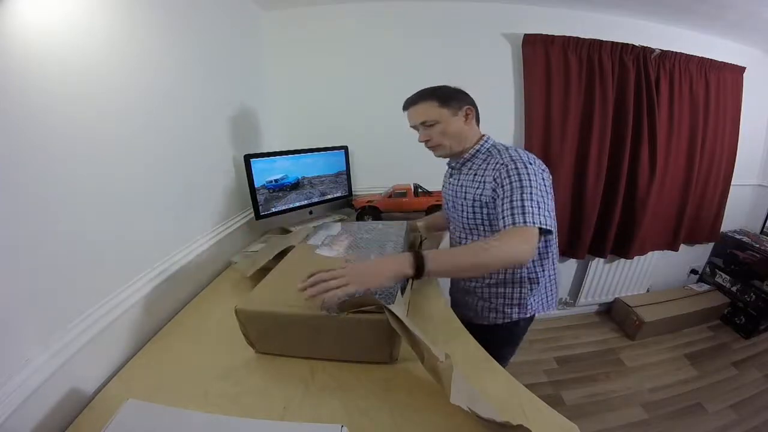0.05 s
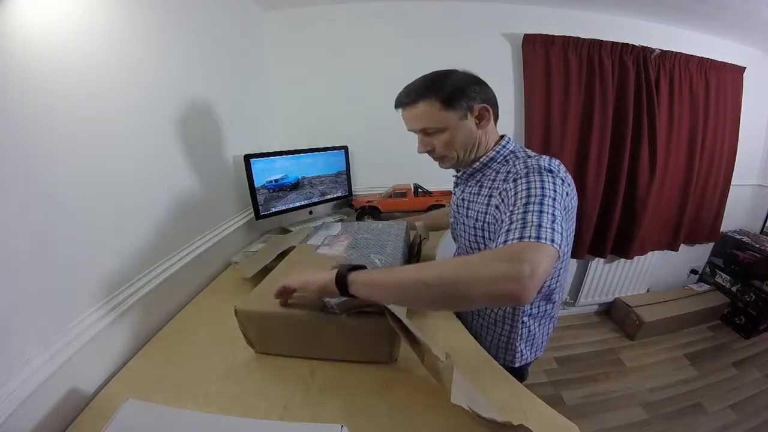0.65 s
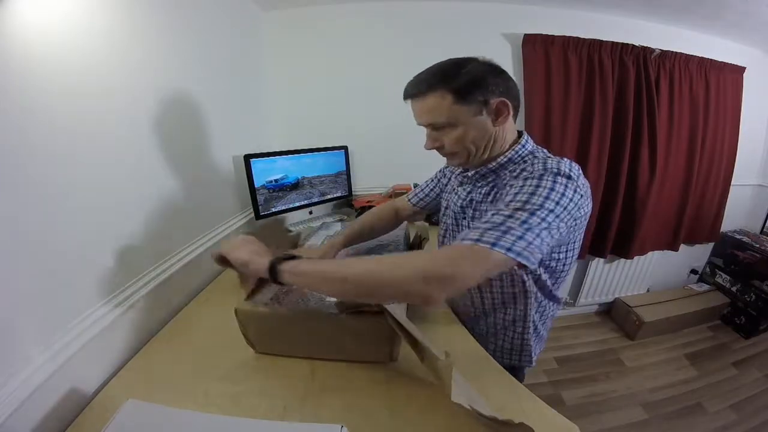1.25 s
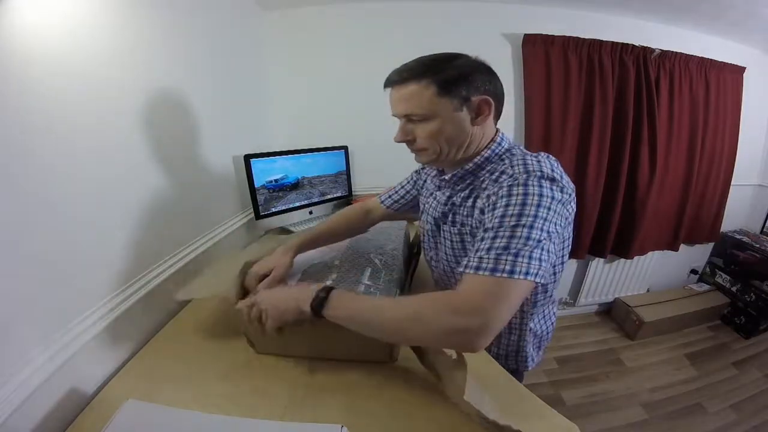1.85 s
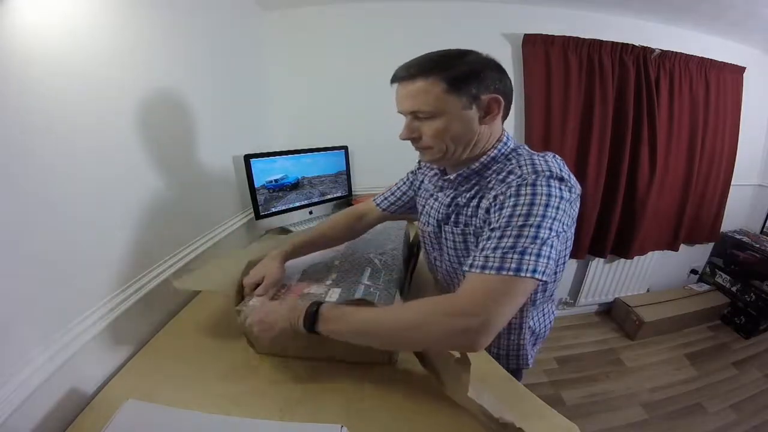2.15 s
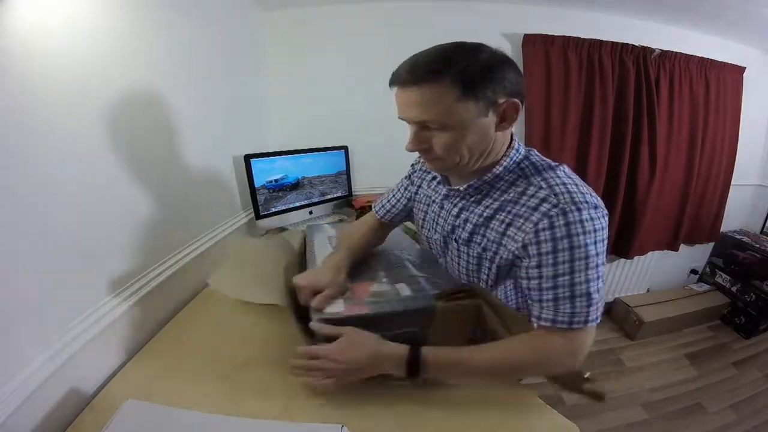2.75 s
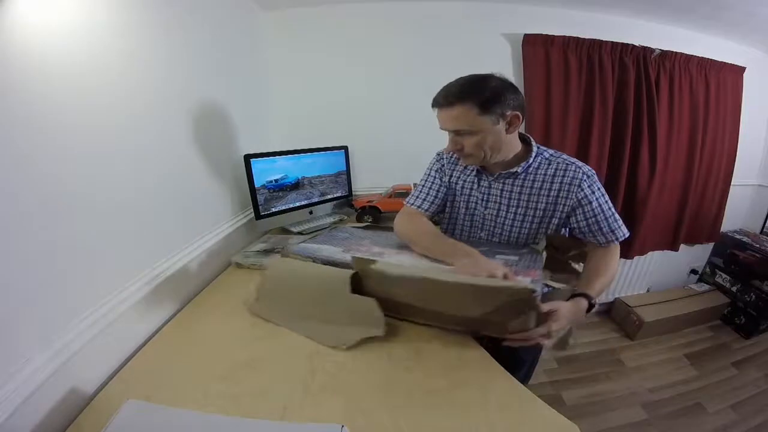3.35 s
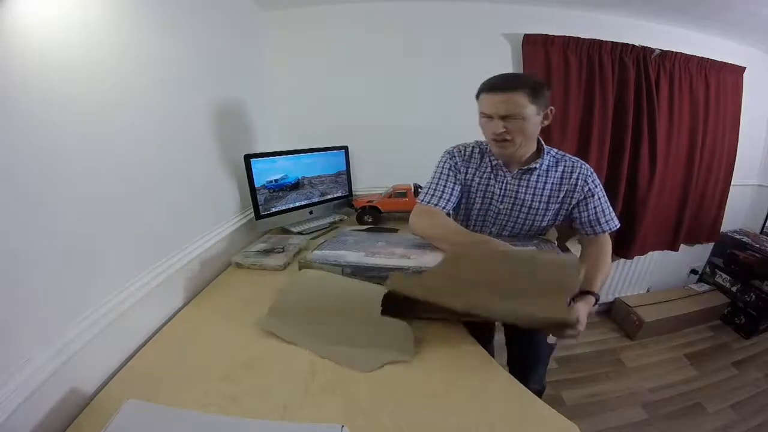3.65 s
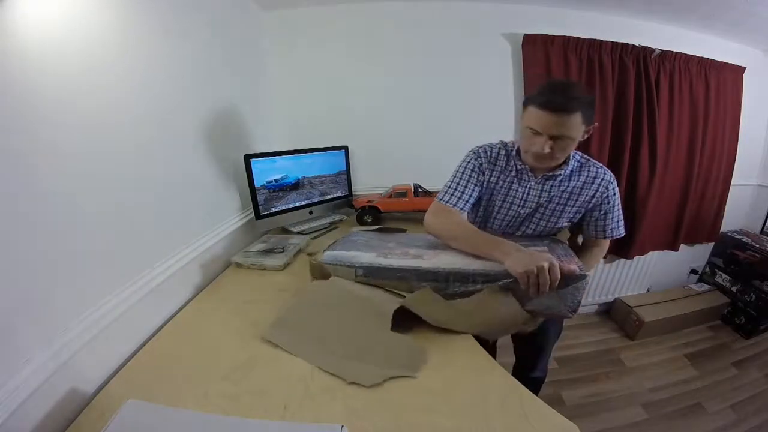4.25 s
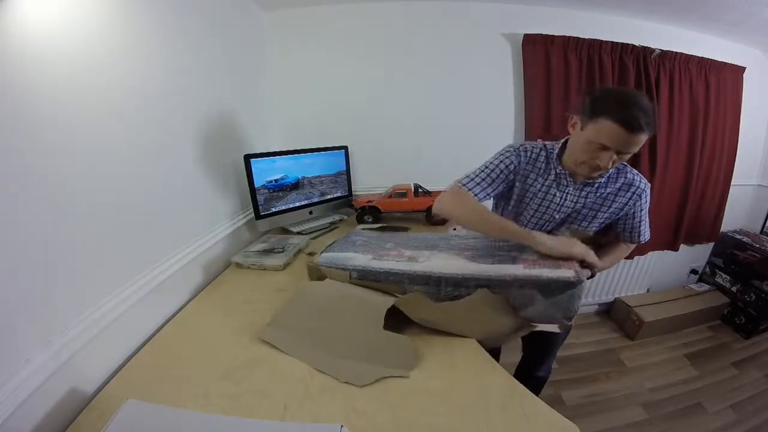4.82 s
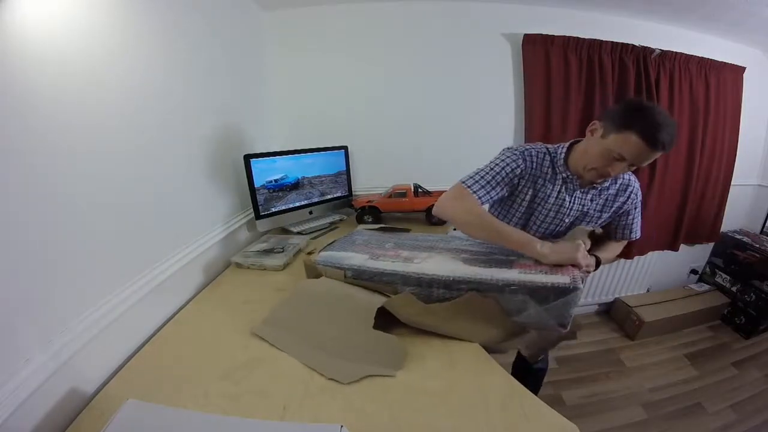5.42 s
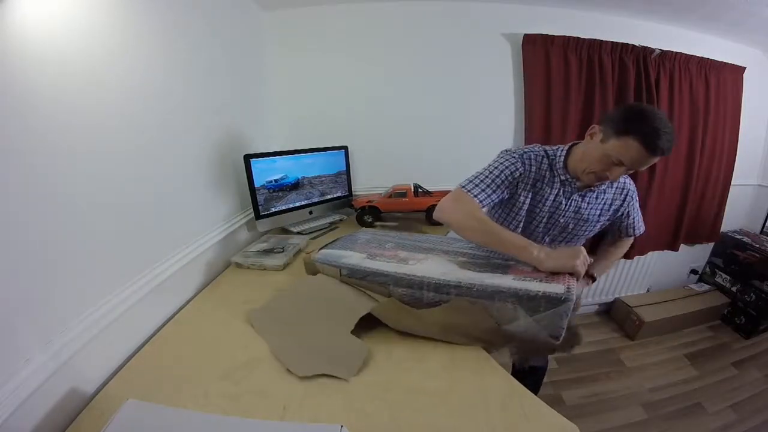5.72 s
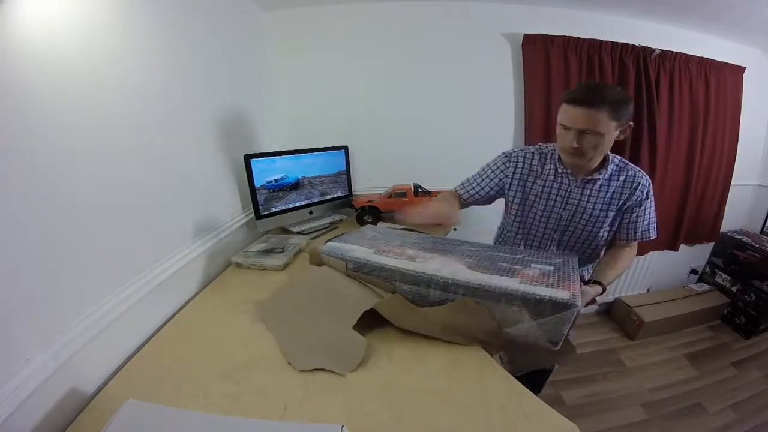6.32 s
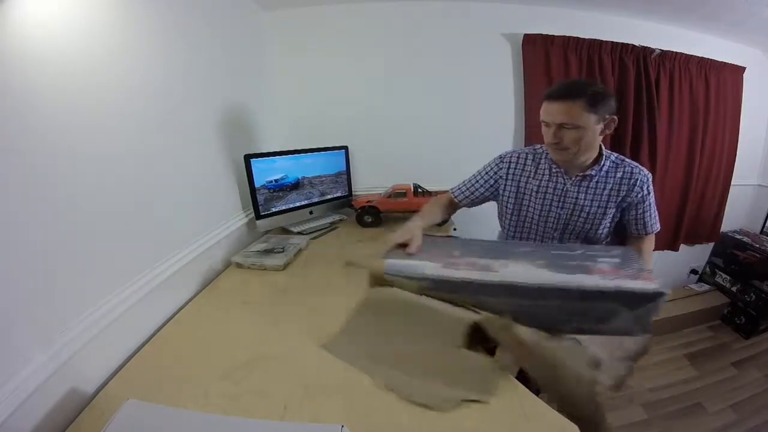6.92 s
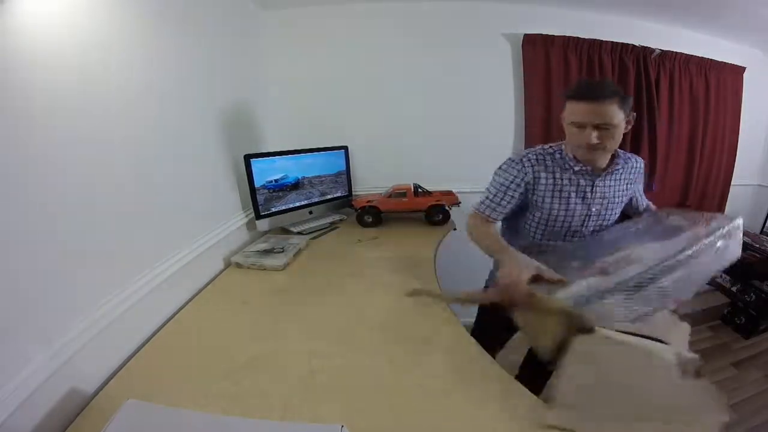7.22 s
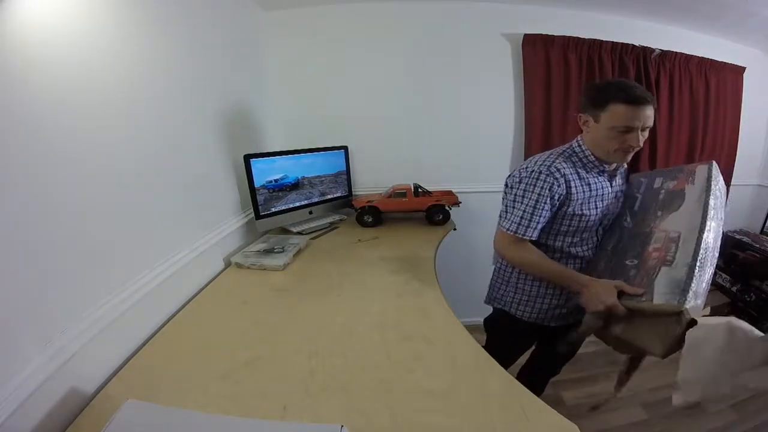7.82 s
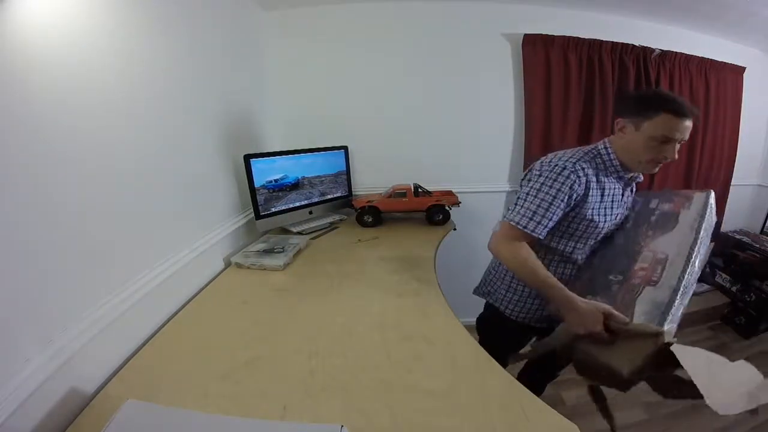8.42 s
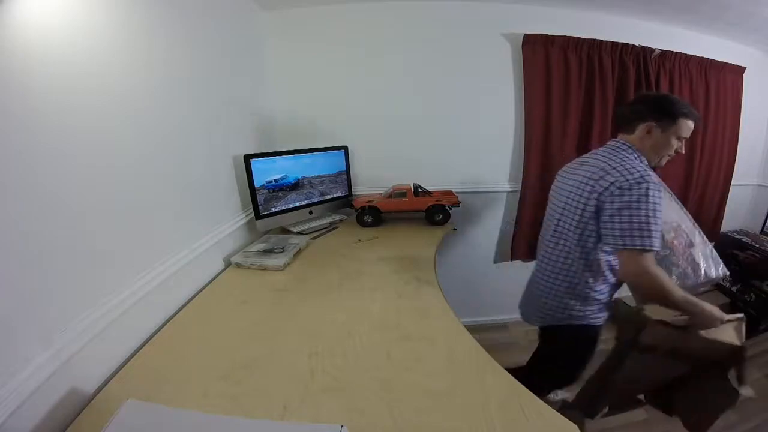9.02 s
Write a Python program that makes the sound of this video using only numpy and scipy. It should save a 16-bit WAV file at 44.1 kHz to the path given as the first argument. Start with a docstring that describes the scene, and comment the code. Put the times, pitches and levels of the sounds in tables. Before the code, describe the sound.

A parcel is unwrapped close to the microphone in a small, hushed room. In the first second, cardboard flaps knock hollowly, with a short squeak and dull bumps. From about 1 to 2.5 seconds, cardboard scrapes, paper crumples and plastic film crinkles in loud, uneven bursts with snapping creases and a tiny high squeak near 2 seconds. The rustling eases around 3 seconds, then surges from 3.5 to 4.2 as flaps knock and the box judders over the desk with a low boom and a thump. Crackling continues, with a knock at 5.2 and another loud crumple near 5.7. Gentler rustling and sliding follow from 6 to 7.4 seconds, ending in a crisp snap. The hollow box bumps dully several times between 7.6 and 8 seconds. Light crinkles and a soft bump trail on, with a last crackle just after 9 seconds.

```python
"""Unpacking a box at a desk

A box wrapped in plastic film is pulled out of its cardboard and packing paper in a small, hushed room.
Cardboard scrapes, paper crumples and film crinkles, each in showers of tiny clicks as its folds slip.
Creases snap, flaps knock and squeak, and the box judders on the desk and bumps against desk and body."""
import sys
import numpy as np
from scipy import signal
from scipy.fft import irfft
from scipy.io import wavfile
from scipy.ndimage import uniform_filter1d

SR = 44100
rng = np.random.default_rng(int(sys.argv[2]) if len(sys.argv) > 2 else 0)


def master(y):
    """Save y as 16-bit WAV."""
    cut = np.clip(np.atleast_2d(y).T, -1, 1)
    pcm = np.round(cut * 32767)  # scale
    wavfile.write(sys.argv[1], SR, pcm.astype(np.int16))


N = 404397
TIME = np.arange(N) / SR
FREQS = np.fft.rfftfreq(4096, 1 / SR)  # every tone curve is read at these frequencies, in Hz


def amp(db):
    """Turns decibels into a gain."""
    return 10 ** (np.asarray(db) / 20)


def unit(x):
    """Scales a signal to an average power of 1."""
    return x / np.sqrt(np.mean(x ** 2) + 1e-20)


def curve(points):
    """Joins (frequency, level) points into a tone curve in dB."""
    hz, db = np.transpose(points)
    return np.interp(np.log(FREQS + 1), np.log(hz + 1), db)


def add(mix, start, sound):
    """Mixes a sound in at a start time in seconds."""
    part = mix[max(round(start * SR), 0):][:len(sound)]
    part += sound[:len(part)]


def colour(x, curve_db):
    """Filters by the shape of a tone curve; white noise keeps its power."""
    log_gain = np.log(amp(np.r_[curve_db, curve_db[-2:0:-1]]))
    spectrum = np.exp(np.conj(signal.hilbert(log_gain)))  # rings after a click, never before
    response = irfft(spectrum[:len(FREQS)])
    return signal.oaconvolve(x, response / np.linalg.norm(response))[:len(x)]


def fade(x, seconds):
    """Gives every click a fading tail."""
    return signal.lfilter([1], [1, -np.exp(-1 / (seconds * SR))], x)


def linger(power, seconds):
    """Spreads power over a fading tail with the same energy."""
    return fade(power, seconds) / (seconds * SR)


def crackle(length, per_s):
    """Tiny clicks of random size and timing, with an average power of 1."""
    chance = min(per_s / SR, 1)
    return rng.standard_normal(length) * (rng.random(length) < chance) / np.sqrt(chance)


def buckle(build_s, clicks_per_s):
    """A sheet gives way in one shower of clicks that builds and dies."""
    age = np.arange(SR // 4) / SR / build_s
    burst = crackle(len(age), clicks_per_s) * age ** 0.7 * np.exp(-age)
    return burst / np.linalg.norm(burst) * np.sqrt(SR / 50)  # as much energy as 20 ms at power 1


def fold_tone(spread_db, width):
    """Each fold rings in its own way: random broad hills and dips for a tone curve."""
    ripple = uniform_filter1d(rng.standard_normal(len(FREQS)), width)
    return spread_db * unit(uniform_filter1d(ripple, width))


def room(x, desk_db, walls_db, desk_s=0.0088, walls_s=0.016):
    """Echoes of a moving source never repeat, so they are noise that trails its power."""
    desk, walls = amp(desk_db) ** 2, amp(walls_db) ** 2
    power = x ** 2 + 1e-20
    echo_power = desk * linger(power, desk_s) + walls * linger(power, walls_s)
    echoes = rng.standard_normal(len(x)) * np.sqrt(echo_power)
    return (x + echoes) / np.sqrt(1 + desk + walls)


def gesture(start, build, hold, swell_db=18, fall_db_per_s=146):
    """The power of one hand movement: it swells, holds at 1 and dies away."""
    age = TIME - start
    rise_db = swell_db * np.minimum(age / build - 1, 0)
    fall_db = fall_db_per_s * np.maximum(age - build - hold, 0)
    return amp(rise_db - fall_db) ** 2


# the tone of the background: f/Hz, level/dB
HUSH_TONE = [(20, 2.5), (100, -4.5), (250, -8.5), (600, -8), (2000, -45), (8000, -31), (15000, -42)]
def hush():
    """The still room and a faint microphone hiss make a steady noise."""
    return amp(-53.5) * colour(rng.standard_normal(N), curve(HUSH_TONE))


# times when the parcel is held: start/s, end/s, firmness/dB
GRIPS = [(.86, 6.02, -2.5), (6.15, 6.6, -11.5), (6.66, 8.13, -1), (8.15, 9.17, -4.5)]
def grip():
    """The power of the small movements of hands holding the parcel."""
    return sum(amp(db) ** 2 * gesture(start, build=0.017, hold=end - start) for start, end, db in GRIPS)


# the boom of the desk top: f/Hz, level/dB
DESK_TONE = [(20, -13), (45, -15), (65, 2.5), (80, -1.5), (100, -3.5), (140, -7.5), (185, -5), (240, -10),
             (400, -7.5), (1500, -89)]
# pushes across the desk: start/s, hold/s, level/dB
SHOVES = [(.27, 0.034, -41.5), (0.642, 0.035, -42), (0.974, 0.12, -43.5), (1.92, 0.025, -42.5),
          (2.38, 0.044, -46), (3.52, .2, -50), (3.785, .1, -34), (3.974, 0.054, -42), (4.317, 0.37, -45),
          (4.83, 0.037, -44.5), (5.147, .32, -45.5), (5.58, 0.36, -44.5), (6.13, 0.026, -42),
          (6.528, 0.11, -42), (6.864, 0.23, -45), (7.53, 0.64, -52), (8.858, 0.18, -50)]
def shoves():
    """The box judders over the desk top, which booms."""
    power = amp(-53) ** 2 * grip()  # a held box never rests quite still
    for start, hold, db in SHOVES:
        power += amp(db) ** 2 * gesture(start, build=0.051, hold=hold, fall_db_per_s=101)
    judder = colour(crackle(N, per_s=400), curve(DESK_TONE))
    return amp(-2) * judder * np.sqrt(power)


# skin on film (high) and flap on flap (low):
# t/s, length/s, first f/Hz, last f/Hz, level/dB, waver/share of the pitch
SQUEAKS = [(0.002, 0.064, 3020, 4060, -43.5, 0.11), (0.603, 0.041, 3960, 3900, -49, 0.069),
           (0.682, 0.074, 620, 605, -27.5, 0.044), (1.958, 0.037, 3770, 4940, -35.5, .09)]
def squeaks(overtone_db=-17, ring_s=0.0083):
    """Quick sticking and slipping makes a note that glides, wavers and rings off."""
    out, t = np.zeros(N), np.arange(SR // 4) / SR
    for start, length, first_hz, last_hz, db, jitter in SQUEAKS:
        glide = (first_hz - last_hz) * np.maximum(1 - t / length, 0) ** 3
        waver = 1 + jitter * unit(fade(rng.standard_normal(len(t)), 0.00047))
        phase = 2 * np.pi * np.cumsum((last_hz + glide) * waver) / SR
        note = np.sin(phase) + amp(overtone_db) * np.sin(2 * phase)
        arch = np.sin(np.pi * np.minimum(t / length, 1))
        swell = np.sqrt(2 * linger(arch, ring_s))
        add(out, start, amp(db) * swell * note)
    return out


# dull bumps of the hollow box: t/s, level/dB, f/Hz, time to fade by 60 dB/s
BUMPS = [(0.316, -35, 375, .1), (0.327, -29, 150.5, 0.23), (0.884, -27.5, 464, 0.18),
         (0.93, -32.5, 151, 0.26), (1.964, -45, 171, 0.15), (2.706, -38, 496, 0.11),
         (2.779, -31.5, 64, 0.21), (3.87, -32, 40.4, 0.36), (4.053, -24.5, 188.5, 0.23),
         (5.194, -32.5, 237, 0.31), (5.292, -32, 144, 0.22), (6.169, -31.5, 97.3, 0.22),
         (6.96, -40, 71.3, .5), (7.605, -25.5, 231, 0.11), (7.621, -26.5, 430, 0.14),
         (7.635, -33.5, 122, 0.2), (7.79, -35.5, 215, 0.27), (7.921, -29, 410, 0.07),
         (7.942, -35, 70.6, 0.25), (7.949, -34, 210, 0.2), (8.522, -37, 164, 0.18)]
def bumps(rise_s=0.0027):
    """A soft blow sets one side of the box swinging unevenly."""
    out, t = np.zeros(N), np.arange(SR // 2) / SR
    for start, db, hz, ring_s in BUMPS:
        wobble = unit(fade(rng.standard_normal(len(t)), 0.0015))
        swing = np.sin(2 * np.pi * hz * t + wobble)
        rise = 1 - np.exp(-t / rise_s)
        add(out, start, swing * rise * amp(db - 60 * t / ring_s))
    return out


# the hollow tone of a cardboard flap: f/Hz, level/dB
FLAP_TONE = [(100, -27), (250, -23), (420, -4.5), (600, -11), (900, 0), (1250, -12), (1700, -10),
             (2300, -13), (3000, -22), (3800, -26), (5500, -32.5), (9000, -32), (15000, -50)]
# flaps knocking: t/s, level/dB, build-up/s
KNOCKS = [(0.327, -25, 0.0015), (0.359, -21.5, 0.00097), (0.658, -29.5, 0.0014), (0.668, -28.5, 0.0062),
          (0.861, -35, 0.00096), (2.7, -32.5, 0.0021), (3.664, -31.5, 0.00099), (3.875, -24, 0.0034),
          (5.197, -24.5, 0.0042), (7.941, -33, 0.0038), (8.561, -40, 0.0012)]
def knocks():
    """A flap slaps shut and rings briefly around its hollow note."""
    out = np.zeros(N)
    for start, db, build_s in KNOCKS:
        slap = room(buckle(build_s, clicks_per_s=6000), desk_db=-2, walls_db=7.5)
        add(out, start, amp(db) * colour(slap, curve(FLAP_TONE)))
    return out


# pulls on the packing: start/s, build-up/s, hold/s, cardboard level/dB, paper level/dB, film level/dB
PULLS = [(0, 0.0067, 0.011, -44.5, -44.5, -46), (0.163, 0.045, 0.015, -50, -52, -51.5),
         (0.562, 0.022, 0.036, -60, -56, -53), (0.841, 0.016, 0.037, -57, -42, -44),
         (1.004, 0.02, 0.041, -28.5, -28.5, -36), (1.041, 0.16, 0.058, -27, -21.5, -24.5),
         (1.333, 0.048, 0.16, -33, -37, -42), (1.558, 0.05, 0.096, -31, -32.5, -59),
         (1.747, 0.057, 0.045, -35.5, -43.5, -49), (1.931, 0.04, 0.02, -34, -38.5, -40),
         (2.211, 0.042, 0.18, -30, -24, -30), (2.684, 0.022, 0.045, -38.5, -39.5, -45),
         (2.84, 0.12, .04, -42, -41.5, -45.5), (3.33, 0.052, .015, -43, -50, -52),
         (3.516, 0.048, 0.034, -35, -40, -59), (3.664, 0.036, 0.039, -32, -34, -37),
         (3.751, 0.04, .14, -26, -29.5, -57), (3.929, .13, 0.062, -23, -24.5, -31.5),
         (4.274, 0.028, 0.11, -34.5, -39.5, -49.5), (4.548, 0.072, 0.02, -29.5, -30, -33.5),
         (4.815, 0.1, 0.017, -36.5, -39, -44), (5.125, 0.12, 0.076, -47, -50, -39.5),
         (5.3, 0.18, 0.2, -32.5, -32.5, -38), (5.629, 0.1, 0.068, -25, -24.5, -29.5),
         (5.85, 0.056, 0.068, -37, -40.5, -60), (6.141, 0.046, 0.027, -36, -36, -38.5),
         (6.414, .03, 0.052, -47, -52, -52), (6.608, 0.27, 0.29, -35.5, -36.5, -43.5),
         (7.372, 0.046, .015, -34.5, -36.5, -43), (7.553, .06, 0.039, -40, -60, -42.5),
         (7.928, 0.063, 0.067, -41, -58, -44), (8.176, 0.023, .015, -50, -69, -60),
         (8.305, 0.017, 0.037, -54, -53, -50.5), (8.593, 0.12, 0.076, -46, -45.5, -57),
         (8.868, 0.057, 0.15, -38, -38.5, -47)]
def effort(grip_db=(-47, -46.5, -48)):
    """How hard the hands work cardboard, paper and film, as three gains: the grip plus every pull."""
    power = np.outer(amp(grip_db) ** 2, grip())
    for start, build, hold, *levels_db in PULLS:
        power += np.outer(amp(levels_db) ** 2, gesture(start, build, hold))
    return np.sqrt(power + 1e-12)


def rustle(tone, gain, slips_per_s, spread_db, slip_s, rub, clicks_per_s, fold_db=3, walls_db=-3):
    """Folds slip in little showers of clicks, over the steady rub of sheet on sheet."""
    sound, power = np.zeros(N), np.zeros(N)
    folds = 4
    for _ in range(folds):
        sizes = amp(spread_db * np.minimum(rng.exponential(1, N), 3))
        starts = rng.random(N) < slips_per_s / folds / SR
        slips = fade(sizes ** 2 * starts + 1e-12, slip_s)
        activity = slips / slips.mean() + rub
        clicks = gain * crackle(N, clicks_per_s) * np.sqrt(activity)
        echoing = room(clicks, desk_db=-3.5, walls_db=walls_db)
        sound += colour(echoing, curve(tone) + fold_tone(fold_db, width=12))
        power += activity
    # the hands set the power; chance only shares it out among the slips
    return sound / np.sqrt(uniform_filter1d(power, size=3000))


# the tones of dull cardboard, crisp paper and bright film: f/Hz, level/dB
CARDBOARD_TONE = [(90, -23.5), (200, -13), (320, -11), (450, -4.5), (680, -4.5), (820, 0), (960, 0),
                  (1100, -5.5), (1350, -9.5), (2200, -16), (5000, -51), (15000, -63)]
PAPER_TONE = [(300, -16.5), (900, -4), (1400, -5), (2000, 4), (2800, -2.5), (3700, -5), (4600, -10.5),
              (6000, -9.5), (15000, -60)]
FILM_TONE = [(1000, -48), (3000, -9), (4500, -4.5), (6500, 2), (8000, -1.5), (9800, -3.5), (11500, -8.5),
             (13500, -16.5), (15500, -23.5)]
def packing():
    """Cardboard scrapes, paper crumples and film crinkles as the hands work them."""
    cardboard_gain, paper_gain, film_gain = effort()
    cardboard = rustle(CARDBOARD_TONE, cardboard_gain, slips_per_s=150, spread_db=3,
                       slip_s=0.0019, rub=0.55, clicks_per_s=2500)
    paper = rustle(PAPER_TONE, paper_gain, slips_per_s=180, spread_db=1,
                   slip_s=0.0028, rub=0.32, clicks_per_s=3500)
    film = rustle(FILM_TONE, film_gain, slips_per_s=180, spread_db=-0.5,
                  slip_s=0.0018, rub=0.81, clicks_per_s=7000, fold_db=3.5, walls_db=-4.5)
    return amp(-1.28) * cardboard + amp(-1.7) * paper + amp(0.56) * film


# the loudest creases: t/s, cardboard level/dB, paper level/dB, film level/dB, build-up/s
SNAPS = [(.254, -50, -56, -51, 0.0014), (0.511, -55, -64, -54.5, 0.0098), (.586, -68, -70, -51, 0.0045),
         (.712, -37.5, -57, -41, 0.0055), (0.726, -42, -39, -52, .0067), (0.744, -56, -31.5, -43.5, 0.0053),
         (.929, -37, -36, -37, 0.0029), (1.024, -34, -23, -21.5, 0.0082), (1.115, -37, -29, -28, .0021),
         (1.154, -39, -27, -28, 0.0033), (1.39, -32, -29.5, -34, 0.0042), (1.48, -36, -30.5, -42, 0.0033),
         (1.578, -30.5, -31, -33.5, .008), (1.647, -27, -23, -24.5, 0.0034),
         (1.774, -44, -41, -70.5, 0.0031), (2.08, -44, -29.5, -27.5, 0.0066), (2.176, -45, -44, -66, 0.003),
         (2.257, -48, -26, -32.5, 0.0057), (2.315, -30, -23.5, -20.5, 0.00093),
         (2.51, -59, -36.5, -57.5, 0.0031), (2.621, -36, -33, -46, 0.0062), (2.737, -46, -56, -41, 0.0015),
         (2.826, -53.5, -58, -45, .0015), (3.117, -49, -46, -70, 0.0013), (3.152, -41, -46, -62, 0.0047),
         (3.539, -43, -32, -42, 0.0026), (3.575, -34, -29.5, -53, 0.0018), (3.648, -35, -40, -59, .0025),
         (3.689, -25.5, -26, -36, .003), (3.816, -24.5, -38, -43, 0.0028), (3.924, -28, -38, -36.5, 0.0036),
         (3.983, -32, -28, -31, 0.0033), (4.429, -31.5, -32, -40.5, 0.0056), (4.546, -36, -35, -43, 0.0028),
         (4.725, -37.5, -49, -46, 0.0071), (4.908, -37, -36.5, -40.5, 0.0047),
         (5.085, -40, -44.5, -69, 0.0023), (5.158, -36, -36.5, -43, 0.0052),
         (5.365, -42, -30, -39.5, 0.0052), (5.503, -40, -25, -40, 0.0074), (5.587, -38, -30, -33, 0.0044),
         (5.738, -26, -23, -29.5, 0.0013), (5.771, -31, -42, -35, 0.0048), (5.981, -37, -38, -58, 0.0065),
         (6.082, -42.5, -40.5, -71, 0.0067), (6.197, -34.5, -38, -49, 0.0078),
         (6.625, -39.5, -44, -67, 0.0096), (7.026, -50, -37, -55, 0.0097), (7.065, -44, -39, -54, 0.0044),
         (7.152, -40, -38.5, -49, .002), (7.325, -46, -47, -50, 0.0029), (7.392, -50, -37, -46, 0.0024),
         (7.407, -37.5, -30, -32.5, 0.008), (7.554, -36, -33, -56, 0.011), (8.527, -46, -47.5, -55, 0.0099),
         (8.608, -54, -37.5, -49, .0015), (8.687, -49, -35.5, -40.5, 0.0023),
         (8.867, -62, -44, -44, 0.0078), (8.915, -50, -38.5, -46, 0.0067), (9.082, -35.5, -38, -39.5, .011)]
def snaps(boost_db=3):
    """A stiff crease gives way and shakes cardboard, paper and film together."""
    out = np.zeros(N)
    for start, *levels_db, build_s in SNAPS:
        for tone, db in zip((CARDBOARD_TONE, PAPER_TONE, FILM_TONE), levels_db):
            burst = room(buckle(build_s, clicks_per_s=7000), desk_db=-10.5, walls_db=-0.5)
            snap = colour(burst, curve(tone) + fold_tone(spread_db=3, width=10))
            add(out, start, amp(db + boost_db) * snap)
    return out


def scene():
    """All the handling noises and the quiet room, in one channel."""
    return (packing() + hush() + snaps() + knocks() + bumps() + squeaks() + shoves())[None]


# where the desk corner and a nearby camera's case ring: f/Hz, width/Hz, level/dB
RESONANCES = [(71.2, 7.1, 12.5), (184, 17, 4.5), (620, 14, -1), (860, 55, 1.5), (2160, 37, 3),
              (3620, 430, 5.5), (4540, 360, 7.5), (4930, 630, -1.5), (7320, 76, 4.5), (6900, 350, 0),
              (9100, 670, 2.5)]
def record(dry, top_hz=15600):
    """Desk and case colour every sound; peaks too big are cut flat, and the top treble is removed."""
    shape_db = np.zeros(len(FREQS))
    for hz, width, db in RESONANCES:
        offset = 2 * (FREQS - hz) / max(width, hz / 45)  # no peak is narrower than 1/45 of its pitch
        shape_db += db / (1 + offset ** 2)
    heard = np.clip(amp(-0.88) * colour(dry[0], shape_db), -1, 1)
    low_pass = signal.firwin(511, top_hz, window=("kaiser", 9), fs=SR)
    return signal.oaconvolve(heard, low_pass, "same")[None]


dry = scene()
out = record(dry)
master(out)
```